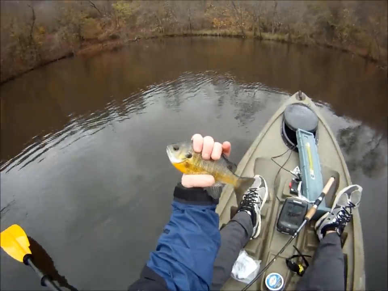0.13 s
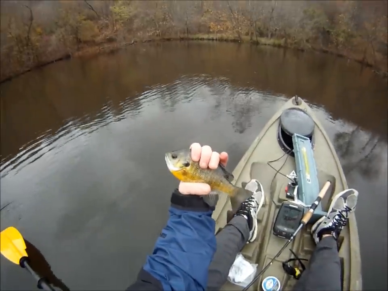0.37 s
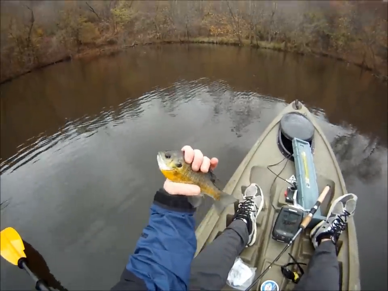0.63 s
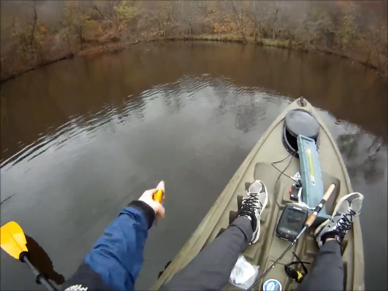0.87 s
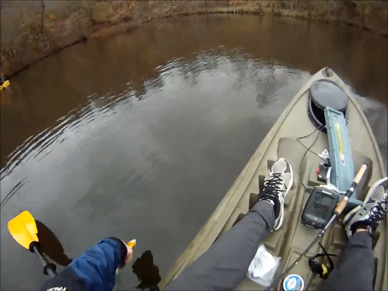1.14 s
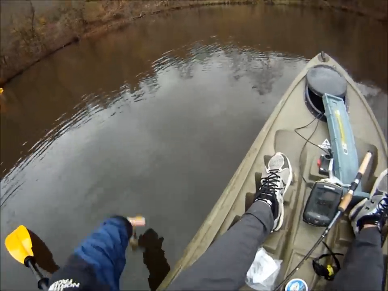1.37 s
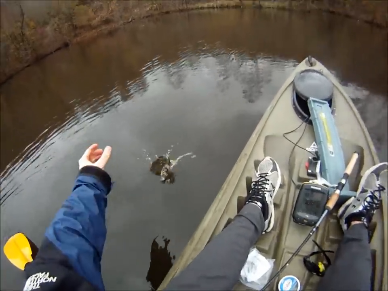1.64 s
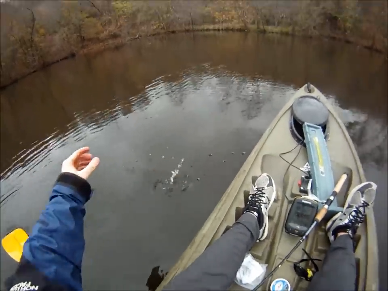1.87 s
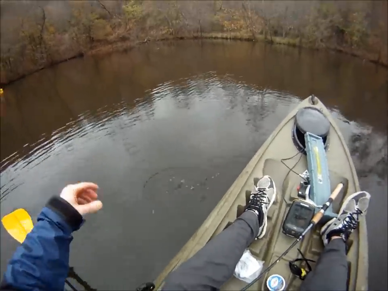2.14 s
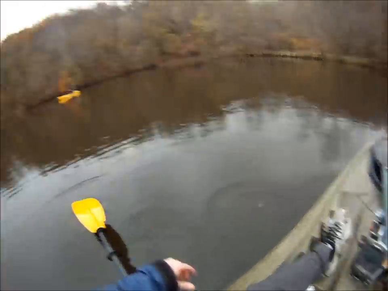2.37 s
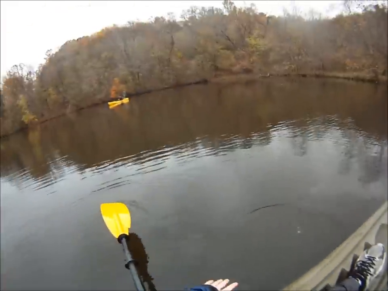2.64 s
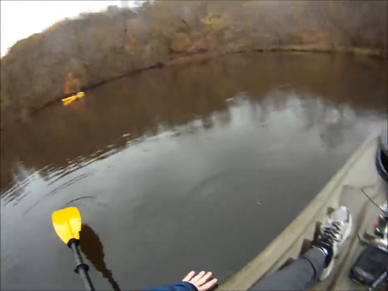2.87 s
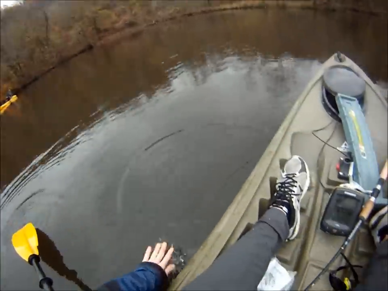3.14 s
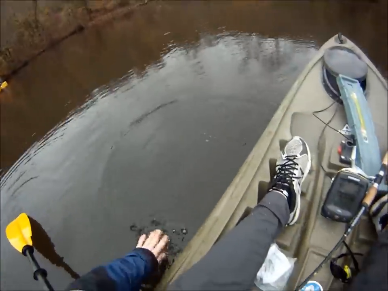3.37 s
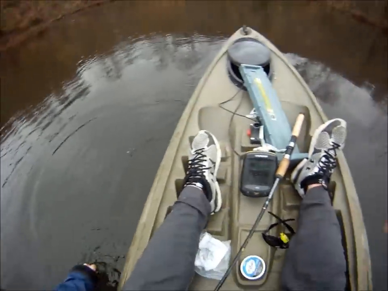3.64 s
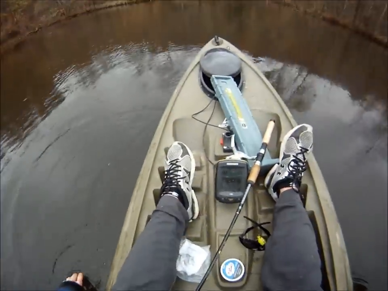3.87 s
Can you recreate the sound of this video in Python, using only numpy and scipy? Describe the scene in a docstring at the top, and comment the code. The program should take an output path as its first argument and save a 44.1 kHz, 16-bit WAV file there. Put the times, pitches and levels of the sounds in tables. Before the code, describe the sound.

Quiet outdoor lake heard through a closed camera housing: low wind rumble, a brief droplet-filled fish splash, gentle bubbly hand splashes and hull slosh, finally an abrupt crackling thump, rubbing and two knocks right at the microphone.

```python
"""A small fish is dropped into a calm lake beside a kayak and a hand then dabbles: ringing slaps with noisy spray,
rising bubble tones and a fizz of resonant grains. At the end something strikes the camera's closed housing (snaps,
crackle, low thump), scrapes along it and knocks twice. Wind rumble, hull slosh and thuds, a cloth rustle and hiss
are shaped noise and short tones. Sampling at 12 kHz adds mirrored copies on both sides of that rate."""
import sys
import numpy as np
from scipy import signal
from scipy.fft import rfft, irfft, next_fast_len
from scipy.io import wavfile
from scipy.ndimage import map_coordinates

SR = 44100
rng = np.random.default_rng(int(sys.argv[2]) if len(sys.argv) > 2 else 0)


def to_wav(sig):
    """Store sig (one row per channel, or 1-D mono) as 16-bit WAV at the path in sys.argv[1].

    Samples outside -1..1 are clipped; the rate is SR.
    """
    pcm = np.clip(np.atleast_2d(sig), -1, 1) * 32767
    pcm = np.round(pcm).astype(np.int16)
    wavfile.write(sys.argv[1], SR, pcm.T)  # frames by channels


def undo_db(level):
    """Turn decibels back into plain size, where 20 dB means ten times bigger."""
    steps = np.asarray(level, float) / 20
    return 10 ** steps


N = 176400
T = np.arange(N) / SR

# low slosh spectrum, relative: (frequency [Hz], level [dB])
SLOSH_SPECTRUM = [(50, -52), (70, 2), (140, -6), (220, -17.5), (400, -35.5)]
# resonances of the closed housing: (centre [Hz], width [Hz], gain [dB])
HOUSING_PEAKS = [(1170, 410, -4), (2050, 340, -0.5), (2700, 330, 0.5), (3840, 450, -19), (4540, 680, -26.5)]
ROUGH_DB = 3  # random level wobble of bubbles and squeak


def unit(x):
    """Scale to rms 1."""
    return x / np.sqrt(np.mean(x ** 2) + 1e-20)


def along(points, hz):
    """(Hz, dB) points as gain, interpolated on a log frequency axis."""
    point_hz, point_db = np.transpose(points)
    return undo_db(np.interp(np.log(hz + 1), np.log(point_hz + 1), point_db))


def curve(rows):
    """(s, dB) rows as dB against time."""
    time_s, level_db = np.transpose(rows)
    return np.interp(T, time_s, level_db)


def wobble(knots_per_s):
    """Smooth random curve through normal knots."""
    return map_coordinates(rng.standard_normal(400), [T * knots_per_s])


def filtered(x, response):
    """x times a response of frequency."""
    size = next_fast_len(N + 8192)
    return irfft(rfft(x, size) * response(np.fft.rfftfreq(size, 1 / SR)), size)[:N]


def noise(spectrum):
    """Coloured noise of rms 1."""
    return unit(filtered(rng.standard_normal(N), lambda hz: along(spectrum, hz)))


def ring(x, peaks):
    """x through parallel broad band-pass resonances of alternating sign."""
    def response(hz):
        total = 0
        for k, (centre_hz, width_hz, db) in enumerate(peaks):
            damping = 1j * hz * width_hz
            total = total + (-1) ** k * undo_db(db) * damping / (centre_hz ** 2 - hz ** 2 + damping)
        return total
    return filtered(x, response)


def grains(per_s, peaks):
    """Random clicks of uneven size, ringing in resonances applied twice; rms 1."""
    clicks = (rng.random(N) < per_s / SR) * rng.standard_normal(N)
    return unit(ring(ring(clicks, peaks), peaks))


def add(out, start_s, x):
    """Mix x into out from start_s."""
    part = out[round(start_s * SR):][:len(x)]
    part += x[:len(part)]


def chirp(start_hz, end_hz, life_s, db):
    """Short swelling and fading tone that glides linearly in pitch."""
    u = np.clip(T[:3000] / life_s, 0, 1)
    phase = 2 * np.pi * np.cumsum(start_hz + (end_hz - start_hz) * u) / SR
    return undo_db(db) * np.sin(np.pi * u ** 0.57) * np.sin(phase)


def thump(hz, sag_per_s, db, rise_s, t60_s):
    """Low push whose pitch sags exponentially as it dies."""
    t = T[:9000]
    envelope = undo_db(db - 60 * t / t60_s) * (1 - np.exp(-t / rise_s))
    return envelope * np.sin(2 * np.pi * hz * (1 - np.exp(-sag_per_s * t)) / sag_per_s)


def hiss():
    """Nearly steady coloured noise."""
    # relative spectrum: (frequency [Hz], level [dB])
    hiss_spectrum = [(41, -34.5), (70, -1), (101, 3.5), (129, -7.5), (158, -0.5), (539, -7), (637, -7.5),
                     (2130, -13.5), (4380, -19), (5900, -22.5), (7670, -48.5), (13000, -120)]
    return undo_db(-63 + 0.25 * wobble(2.3)) * noise(hiss_spectrum)


def wind_rumble():
    """Low noise with an uneven, wavering level."""
    # relative spectrum: (frequency [Hz], level [dB])
    rumble_spectrum = [(12, -29), (22, 6), (45, -2), (65, -16), (130, -33.5), (250, -61), (400, -87)]
    # (time [s], level [dB])
    rumble_level = [(0.0, -50), (0.65, -62.5), (0.79, -50), (0.82, -74.5), (0.85, -46.5), (0.96, -59),
                    (1.39, -43.5), (1.45, -56), (1.7, -46.5), (1.85, -53.5), (2.15, -57.5), (2.23, -45.5),
                    (2.56, -52.5), (3.08, -49.5), (3.18, -52.5), (3.41, -43.5), (3.58, -48.5), (3.78, -48)]
    return undo_db(curve(rumble_level) + 1.44 * wobble(6.4)) * noise(rumble_spectrum)


def hull():
    """Low noise of slosh against the hull, and soft bumps as short tones of fixed pitch."""
    # (time [s], level [dB])
    slosh_level = [(0, -68.5), (2.0, -67), (2.5, -62.5), (2.9, -60.5), (3.08, -57), (3.2, -60.5),
                   (3.5, -65.5), (3.8, -59)]
    # soft bumps: (time [s], frequency [Hz], level [dB], length [cycles])
    thuds = [(2.18, 107.3, -43, 1.6), (2.238, 80.5, -44, 1.2), (2.959, 148.4, -50, 7.33),
             (3.07, 100, -51, 4.3), (3.359, 120, -42.5, 1.3)]
    out = undo_db(curve(slosh_level) + 1.4 * wobble(15)) * noise(SLOSH_SPECTRUM)
    for start_s, hz, db, cycles in thuds:
        add(out, start_s, chirp(hz, hz, cycles / hz, db))
    return out


def sleeve_rustle():
    """One bell-shaped swell of noise from cloth."""
    # relative spectrum: (frequency [Hz], level [dB])
    rustle_spectrum = [(800, -27), (2000, -6), (5900, -1)]
    centre_s, width_s, peak_db = 2.377, 0.078, -61.5
    return undo_db(peak_db) * np.exp(-((T - centre_s) / width_s) ** 2) * noise(rustle_spectrum)


def blow():
    """Strike on the housing: snaps ringing in it, noise crackle, a sagging thump and its slow rebound."""
    # crackle spectrum, relative: (frequency [Hz], level [dB])
    crackle_spectrum = [(150, -35), (300, -21), (700, -29), (1000, -6.5), (1600, -5), (2900, 1.5),
                        (3500, -5), (4200, -16), (4800, -10), (6000, -25)]
    # (time [s], level [dB])
    crackle_level = [(3.8102, -27.5), (3.814, -24), (3.819, -23), (3.83, -26), (3.84, -28.5),
                     (3.847, -40.5), (3.865, -44), (3.885, -38.5), (3.91, -35), (3.94, -35.5), (3.96, -40),
                     (4, -40.5)]
    # first hard contacts: (time [s], level before a common gain [dB])
    snap_hits = [(3.815, -2), (3.816, -3.5), (3.8179, 1.5)]
    # slow dip after the thump: (time [s], start [Hz], end [Hz], life [s], level [dB])
    rebound = (3.848, 23, 23, .024, -25)
    started = T > crackle_level[0][0]
    out = started * undo_db(curve(crackle_level) + 1.5 * wobble(90)) * noise(crackle_spectrum)
    add(out, 3.818, -thump(hz=65.3, sag_per_s=20, db=-7, rise_s=0.0047, t60_s=0.065))
    add(out, rebound[0], -chirp(*rebound[1:]))
    snaps = np.zeros(N)
    for hit_s, db in snap_hits:
        snaps[round(hit_s * SR)] = -undo_db(db + 14.5)  # common gain
    return out + ring(snaps, HOUSING_PEAKS)


def scrape():
    """Rubbing along the housing: dense ringing slips with a broad wash, low rumble and a squeak."""
    # resonances, applied twice: (centre [Hz], width [Hz], gain per pass [dB])
    rubbed_peaks = [(1250, 400, -4), (2064, 460, 0.5), (1584, 304, -15)]
    # broad hiss, relative: (frequency [Hz], level [dB])
    wash_spectrum = [(120, -25), (300, -13), (700, -12), (1100, -5), (2500, -4), (3800, -5.5),
                     (5000, -12.5), (6000, -8)]
    # level of the slips: (time [s], level [dB])
    scrape_level = [(3.853, -43), (3.863, -37), (3.868, -31), (3.882, -25), (3.89, -31), (3.898, -28),
                    (3.912, -32), (3.927, -31), (3.94, -30.5), (3.955, -33), (3.97, -31.5), (3.99, -36.5),
                    (4, -38)]
    # low rumble: (time [s], level [dB])
    bump_level = [(3.86, -55), (3.902, -50), (3.934, -43), (3.952, -45), (3.978, -42), (4.0, -36)]
    # (time [s], start [Hz], end [Hz], life [s], level before wobble [dB])
    squeak = (3.956, 3950, 4100, .022, -31)
    wash_over_slips_db = -4.5
    rub = grains(per_s=5000, peaks=rubbed_peaks) + undo_db(wash_over_slips_db) * noise(wash_spectrum)
    out = (T > scrape_level[0][0]) * undo_db(curve(scrape_level) + 1.0 * wobble(90)) * rub
    out += (T > bump_level[0][0]) * undo_db(curve(bump_level)) * noise(SLOSH_SPECTRUM)
    add(out, squeak[0], chirp(*squeak[1:]) * undo_db(ROUGH_DB * wobble(320)[:3000]))
    return out


def knocks():
    """Knocks on the housing: decaying modes, a noise burst ringing in it and a low push just ahead."""
    # (time [s], level [dB])
    knock_hits = [(3.928, -21), (3.9757, -15)]
    # (frequency [Hz], level over the knock [dB], t60 [s])
    knock_modes = [(1150, -5.5, 0.015), (2900, -11, 0.0108), (3640, -1.5, 0.015), (4700, -17.5, 0.0063)]
    # low push: (start [Hz], sag [per s], level over the knock [dB], rise [s], t60 [s])
    knock_push = (430, 270, 2.5, .0015, .028)
    push_lead_s, burst_over_knock_db, burst_t60_s = 0.001, 7.5, 0.031
    out, bursts, t = np.zeros(N), np.zeros(N), T[:9000]
    for hit_s, db in knock_hits:
        for hz, mode_db, t60_s in knock_modes:
            add(out, hit_s, undo_db(db + mode_db - 60 * t / t60_s) * np.sin(2 * np.pi * hz * t))
        burst_gain = undo_db(db + burst_over_knock_db - 60 * t / burst_t60_s)
        add(bursts, hit_s, burst_gain * rng.standard_normal(len(t)))
        add(out, hit_s - push_lead_s, -undo_db(db) * thump(*knock_push))
    return out + ring(bursts, HOUSING_PEAKS)


def stirred_water():
    """Fizz of small drops: dense random clicks ringing in resonances."""
    # resonances, applied twice: (centre [Hz], width [Hz], gain per pass [dB])
    fizz_peaks = [(1100, 290, -3), (2107, 482, 0.5), (2900, 200, -3.5)]
    # (time [s], level [dB])
    stir_level = [(0, -79), (.7, -72.5), (1.1, -81), (1.4, -70), (1.55, -73), (1.6, -66), (1.62, -64),
                  (1.65, -58), (1.67, -54), (1.685, -68), (1.8, -70), (2.1, -75.5), (2.35, -70), (2.6, -78),
                  (3.0, -71), (3.09, -69.5), (3.28, -66), (3.41, -77), (3.45, -65.5), (3.53, -67),
                  (3.78, -70.5)]
    return undo_db(curve(stir_level) + 2.2 * wobble(25.07)) * grains(per_s=2400, peaks=fizz_peaks)


def bubbles():
    """Bubbles as short rising tones of rough level."""
    # (time [s], start [Hz], end [Hz], life [s], level before wobble [dB])
    bubble_rows = [(1.615, 1044, 1150, 0.018, -63), (1.633, 614, 897, 0.01, -60.5),
                   (1.646, 808, 1150, 0.0146, -57), (3.105, 1100, 1210, 0.0109, -55.5),
                   (3.135, 680, 1010, .02, -60.5), (3.148, 976, 1236, 0.0282, -52.5),
                   (3.147, 1680, 1750, 0.013, -53), (3.21, 950, 1250, 0.016, -63.5),
                   (3.223, 1750, 2430, 0.0111, -48.5), (3.3, 1100, 1230, 0.015, -57),
                   (3.733, 1090, 1190, 0.0095, -58)]
    out = np.zeros(N)
    for start_s, start_hz, end_hz, life_s, db in bubble_rows:
        tone = chirp(start_hz, end_hz, life_s, db)
        add(out, start_s, tone * undo_db(ROUGH_DB * wobble(360)[:3000]))
    return out


def slaps():
    """Droplet slaps: decaying tones of rising pitch, each with a burst of spray noise."""
    # (time [s], ring level [dB], ring start [Hz], spray level [dB])
    slap_rows = [(1.566, -51, 2890, -58), (1.572, -50, 2900, -58), (1.5945, -44, 2450, -52),
                 (1.601, -46.5, 2750, -49), (1.6335, -42, 2260, -52), (1.642, -45, 2500, -51.5),
                 (1.647, -46, 2680, -51), (1.653, -43, 2360, -49), (1.658, -39, 2300, -43),
                 (1.6612, -30.5, 2400, -38), (1.6655, -46, 2350, -47), (1.669, -41, 2136, -52),
                 (1.696, -48, 1930, -60), (1.742, -49.5, 2220, -66.5), (1.903, -49, 2900, -57.5),
                 (3.121, -46.5, 2050, -62), (3.217, -50, 2700, -52), (3.279, -55, 2050, -51),
                 (3.3005, -47, 1983, -48.5), (3.326, -51.5, 3500, -52), (3.532, -48, 2310, -41.5),
                 (3.629, -59.5, 2070, -51), (3.734, -49, 2160, -50)]
    # relative spectrum: (frequency [Hz], level [dB])
    spray_spectrum = [(400, -28), (800, -8), (2500, 1.5), (3900, -3), (5000, -3), (6000, -9.5)]
    ring_t60_s, ring_rise_s = 0.012, 0.00059
    spray_t60_s, spray_rise_s = 0.00958, 0.00023
    tones, spray_gain, t = np.zeros(N), np.zeros(N), T[:2000]
    ring_shape = undo_db(-60 * t / ring_t60_s) * (1 - np.exp(-t / ring_rise_s))
    spray_shape = undo_db(-60 * t / spray_t60_s) * (1 - np.exp(-t / spray_rise_s))
    for start_s, ring_db, hz, spray_db in slap_rows:
        add(tones, start_s, undo_db(ring_db) * ring_shape * np.sin(2 * np.pi * hz * t * (1 + 6 * t)))
        add(spray_gain, start_s, undo_db(spray_db) * spray_shape)
    return tones + spray_gain * noise(spray_spectrum)


def scene():
    """Sum of background, housing and water, one channel."""
    background = hiss() + wind_rumble() + hull() + sleeve_rustle()
    housing = blow() + scrape() + knocks()
    water = stirred_water() + bubbles() + slaps()
    return (background + housing + water)[None]


def band_limit(x):
    """A steep low-pass at the top of the band."""
    return signal.sosfilt(signal.butter(12, 16390, fs=SR, output="sos"), x)


def record(dry):
    """Low-rate sampling: low-passed sound plus its copies mirrored about the sampling rate."""
    # gain of the mirrored copies: (frequency [Hz], gain [dB])
    mirror_gain = [(6000, -0.5), (8000, -5), (10000, -13), (10900, -18.5), (11500, -24), (12000, -46.5),
                   (12500, -36), (13100, -17.5), (14200, -15.5), (15300, -10.5), (15700, -45), (16400, -54)]
    sampled_hz = 12000
    base = filtered(dry[0], lambda hz: 1 / (1 + (hz / 5700) ** 28))
    copies = 2 * base * np.cos(2 * np.pi * sampled_hz * T)
    mirrored = filtered(copies, lambda hz: along(mirror_gain, hz))
    return band_limit((base + mirrored)[None])


dry = scene()
out = record(dry)
to_wav(out)
```